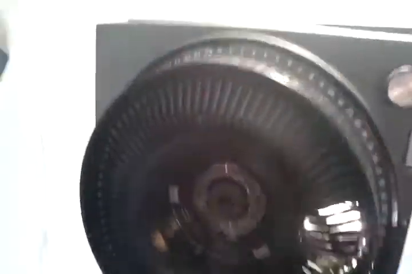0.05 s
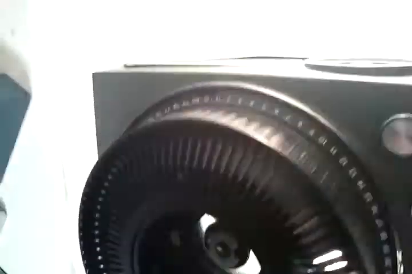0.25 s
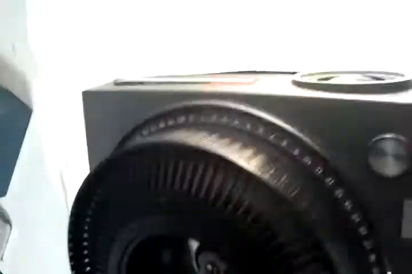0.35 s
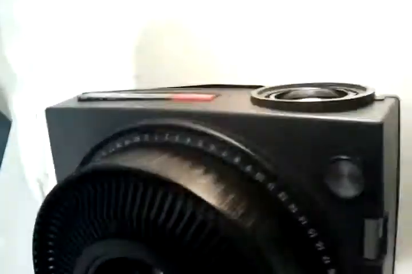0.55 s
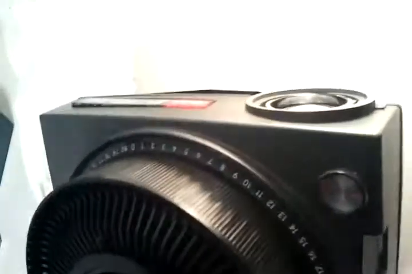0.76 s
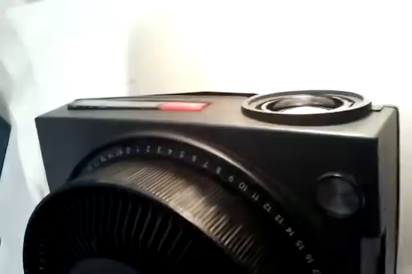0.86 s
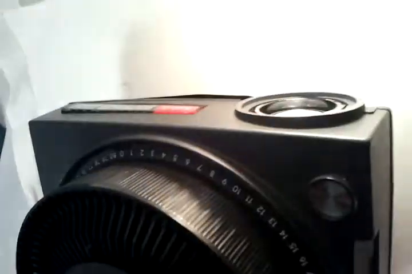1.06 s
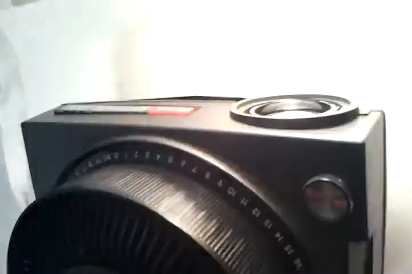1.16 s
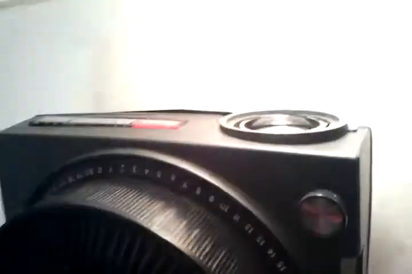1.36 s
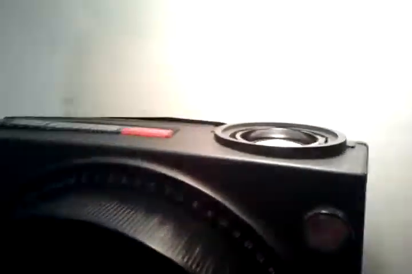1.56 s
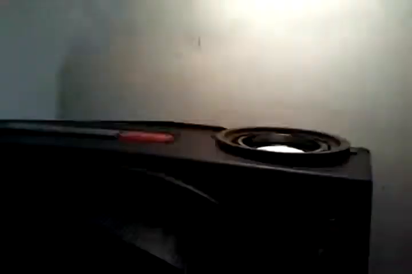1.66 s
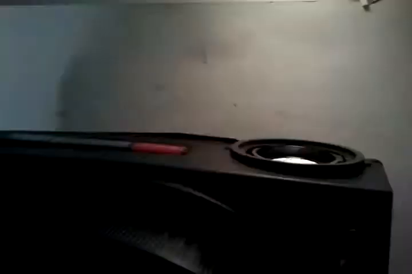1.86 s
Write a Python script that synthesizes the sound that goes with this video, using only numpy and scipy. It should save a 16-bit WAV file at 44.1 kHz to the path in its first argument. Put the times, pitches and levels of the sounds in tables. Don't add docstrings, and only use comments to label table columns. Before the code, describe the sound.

A slide projector runs close to a small, dull microphone in a quiet room. Dry, uneven ticks patter about forty times a second over fan air, low hum and a faint two-tone whine that sags around 0.8 seconds. A loud metallic lever clack rattles and distorts at 0.2; small knocks and scrapes follow, clustering near 0.87 and 1.3; a second harsh tray clack hits at 1.6, then ticking continues.

```python
import sys
import numpy as np
from scipy import signal
from scipy.fft import rfft, irfft
from scipy.io import wavfile
from scipy.ndimage import uniform_filter1d

SR = 44100
rng = np.random.default_rng(int(sys.argv[2]) if len(sys.argv) > 2 else 0)


def store_wav(level_fs):
    pcm = np.round(np.clip(np.atleast_2d(level_fs), -1, 1) * 32767)
    wavfile.write(sys.argv[1], SR, pcm.T.astype(np.int16))


def undo_db(level):
    steps = np.asarray(level, float) / 20
    return 10 ** steps


N = 83790

# start_s, first_tick_db, second_tick_db
SHAFT_TURNS = [(.0159, -14, -13), (.1062, -19, -15.5), (.195, -8, -10.5), (.2845, -14.5, -17.5),
               (.375, -18.5, -19), (.4653, -15.5, -22.5), (.5556, -16.5, -10), (.65, -23.5, -18.5),
               (.7432, -15, -21.5), (.8365, -15, -16.5), (.9303, -18, -16.5), (1.0216, -21.5, -16.5),
               (1.1101, -15, -21.5), (1.1972, -16.5, -25), (1.2855, -21, -15), (1.3739, -14, -18.5),
               (1.4631, -18, -18.5), (1.5529, -16.5, -16.5), (1.642, -21, -28), (1.7325, -15.5, -14.5),
               (1.8253, -22, -17), (1.9185, -11, -10)]
# mode_hz, level_db, t60_s
HOUSING_MODES = [(2700, 0, 0.015), (3034, -0.5, 0.024), (3222, 3.5, 0.015), (3744, 2, 0.015),
                 (2000, -43, 0.015), (900, -10.5, 0.031)]
# time_s, pitch_hz, level_db
GEAR_TONE = [(0, 772, -41), (.3, 768, -38), (.5, 758, -43), (.72, 745, -46.5), (.85, 745, -43),
             (.96, 763, -39), (1.08, 777, -41.5), (1.3, 778, -39), (1.55, 770, -41), (1.75, 763, -44.5),
             (1.9, 758, -42.5)]
# start_s, level_db, rattle_s
CLACKS = [
    (0.2194, -7.5, 0.017),
    (1.5869, -7, 0.017),
]
# mode_hz, level_db, t60_s
LEVER_MODES = [(468, -7, .2), (900, -11, .1), (1335, -10, .1), (1600, -9, .08), (1957, -2, .14),
               (2135, 0, .3), (2258, -2, .4), (2355, -5, .12), (2650, -4, .08), (2840, -5, .08),
               (3390, -4, .08), (4150, -8, .09), (5560, -7, .08), (6300, -9, .1)]
# mode_hz, level_db, t60_s
TRAY_MODES = [(500, -7, .3), (1017, -6, .09), (1250, -7, .09), (1600, -7, .08), (1960, -2, .12),
              (2073, 0, .4), (2406, -7, .12), (2681, -3, .1), (2830, -5, .1), (3100, -1, .1),
              (3400, -5, .08), (3914, -3, .09), (6090, -5, .1), (6700, -7, .07)]
# freq_hz, level_db
CRASH_SPECTRUM = [(60, -23.5), (440, -17.5), (1100, -4), (2160, -12), (3500, -3), (4800, -10.5),
                  (6800, -10.5), (9500, -9.5)]
# start_s, level_db, length_s, body_hz, treble_db
KNOCKS = [(0.188, -30, 0.015, 1000, -1.5), (0.377, -42, 0.022, 3000, -7), (.463, -23, 0.0029, 2180, -3),
          (0.625, -30, 0.0044, 2300, 4.5), (0.636, -39, 0.014, 2400, -5), (0.706, -42, 0.03, 2500, 2),
          (0.756, -39, .002, 1200, 6), (0.767, -46.5, 0.03, 2500, 4.5), (0.8706, -25.5, .001, 2000, -0.5),
          (0.872, -29.5, 0.014, 900, -16), (0.879, -32, 0.014, 2070, -13), (1.271, -26.5, 0.009, 4100, 3.5),
          (1.278, -24, 0.0044, 2000, -5), (1.2974, -18, 0.0012, 4140, -3.5),
          (1.302, -16.5, 0.0017, 2310, 3), (1.307, -22.5, 0.006, 2560, 2),
          (1.317, -32.5, 0.012, 5150, -4.5), (1.518, -36, 0.0046, 3500, -20.5),
          (1.559, -26.5, 0.0037, 1200, 2.5), (1.574, -37.5, 0.0069, 1200, 1),
          (1.674, -37, 0.0071, 2100, -34), (1.824, -27.5, 0.0082, 2400, 4)]
# mode_hz, level_db, t60_s
PAWL_MODES = [(1550, -5, .025), (2380, -4, .03), (3300, -8, .025), (4150, -6, .02), (4900, -9, .02),
              (5700, -5, .04), (6600, -2, .04), (7900, -2, .03)]
# freq_hz, density_db
AIR_SPECTRUM = [(40, -16.5), (118, -3.5), (661, -12.5), (800, -2.5), (2320, -16), (3200, -19),
                (4600, -20.5), (9500, -29)]
# centre_hz, width_hz, level_db
CASE_RESONANCES = [(134, 21, -12), (445, 377, -3), (808, 75, -8.5), (972, 260, -6.5), (2012, 450, -8),
                   (2916, 900, -3.5), (3050, 140, -20.5), (3585, 86, -9.5), (7050, 600, -17)]

TICK_DB, TICK_SCATTER_DB, TICK_GRIT = -4.5, 1.2, .09
TICK_CENTRE_HZ, TICK_WIDTH_HZ = 3097, 1300
TICK_LAG_S, SECOND_TICK_TURNS = .0008, .352
BLADE_RATIO, BLADE_DB = 1.386, -2.5
TONE_WOBBLE_DB, PITCH_WOBBLE = 2.5, 0.00407
RATTLE_PER_S, RATTLE_SCATTER_DB, RATTLE_T60_S = 1100, 1, .11
BUZZ, RING_SHARE = .1, .42
CRACK_DB, CRACK_HZ, CRACK_T60_S = -1, 7030, 0.031
CRASH_DB, CRASH_T60_S = -1, .1
CRASH_TAIL_DB, CRASH_TAIL_T60_S = -12.5, .3
KNOCK_RISE_S, KNOCK_T60_S, KNOCK_START = .0007, 0.042, 0.27
KNOCK_GRIT, KNOCK_WIDTH, TREBLE_HZ = .6, .35, 7400
KNOCK_RING_DB = -25
THUMP_S, THUMP_HZ, THUMP_DB, THUMP_T60_S = 1.3, 75, -29.5, 0.097
AIR_DB, CASE_DB, FLICKER_DB = -39, -36.5, 4.5
HUM_HZ, HUM_DB, HUM_WOBBLE_DB = 118.3, -47.5, 1
ROOM_DB, ROOM_T60_S = -16.5, 0.16
MIC_TOP_HZ, MIC_STOP_HZ, MIC_LOW_HZ = 7730, 9517, 65.8
CEILING, KNEE = .72, 20


def level(x, db):
    return x * undo_db(db) / np.sqrt(np.mean(x ** 2))


def band(x, hz, width_hz):
    return signal.lfilter(*signal.iirpeak(hz, hz / width_hz, fs=SR), x)


def ring(x, modes):
    out = 0
    for hz, db, t60_s in modes:
        pole = np.exp(2j * np.pi * hz / SR - np.log(1000) / (t60_s * SR))
        out = out + undo_db(db) * signal.lfilter([1], [1, -pole], x).imag
    return out


def colour(points):
    hz, db = np.array(points).T
    log_hz = np.log(np.fft.rfftfreq(N, 1 / SR) + 1)
    gain = undo_db(np.interp(log_hz, np.log(hz), db))
    return level(irfft(rfft(rng.standard_normal(N)) * gain, N), 0)


def walk(rate_hz):
    k = int(SR / rate_hz)
    steps = np.repeat(rng.standard_normal(N // k + 1), k)
    return 0.95 * uniform_filter1d(uniform_filter1d(steps, k), k)[:N]


def burst(t, start_s, length_s, rise_s, t60_s):
    rise = np.clip((t - start_s) / rise_s, 0, 1)
    return rise * undo_db(-60 * np.clip(t - start_s - length_s, 0, None) / t60_s)


def shaft_ticks(t):
    times, first_db, second_db = np.array(SHAFT_TURNS).T
    turns = np.arange(len(times)) * 2.
    whole = np.arange(turns[-1])
    when = np.interp(whole[:, None] + [0, SECOND_TICK_TURNS], turns, times) + TICK_LAG_S
    db = np.c_[np.interp(whole, turns, first_db), np.interp(whole, turns, second_db)]
    db = db + TICK_SCATTER_DB * rng.standard_normal(when.shape)
    inside = when < t[-1]
    clicks = np.zeros(N)
    clicks[(when[inside] * SR).astype(int)] = undo_db(db[inside] + TICK_DB)
    rub = signal.lfilter([1], [1, -.98], np.roll(clicks, 1))
    push = rng.standard_normal(N) * TICK_GRIT * rub
    soft = band(clicks + push, TICK_CENTRE_HZ, TICK_WIDTH_HZ)
    soft = band(soft, TICK_CENTRE_HZ, TICK_WIDTH_HZ)
    return ring(soft, HOUSING_MODES) / 2


def gear_and_blade_tones(t):
    times, hz, db = np.array(GEAR_TONE).T
    pitch_hz = np.interp(t, times, hz) * (1 + PITCH_WOBBLE * walk(18))
    angle = 2 * np.pi * np.cumsum(pitch_hz) / SR
    gear = undo_db(TONE_WOBBLE_DB * walk(15)) * np.sin(angle)
    blade = undo_db(BLADE_DB + TONE_WOBBLE_DB * walk(15)) * np.sin(BLADE_RATIO * angle)
    return np.sqrt(2) * undo_db(np.interp(t, times, db)) * (gear + blade)


def changer_clacks(t):
    out = 0
    for (start_s, db, length_s), parts in zip(CLACKS, (LEVER_MODES, TRAY_MODES)):
        chance, size = rng.random((2, N))
        hits = (chance < RATTLE_PER_S / SR) * undo_db(-RATTLE_SCATTER_DB * np.log(size + 1e-9))
        shake = (hits + BUZZ) * burst(t, start_s, length_s, .0005, RATTLE_T60_S)
        rung = 0
        for hz, part_db, t60_s in parts:
            part = ring(shake * rng.standard_normal(N), [(hz, 0, RING_SHARE * t60_s)])
            rung = rung + level(part, part_db)
        crack = level(band(rng.standard_normal(N), CRACK_HZ, 1500), CRACK_DB)
        crack = crack * burst(t, start_s, 0.0018, .0003, CRACK_T60_S)
        fade = burst(t, start_s, length_s * 1.06, .001, CRASH_T60_S)
        fade = fade + undo_db(CRASH_TAIL_DB) * burst(t, start_s, length_s, 0.00076, CRASH_TAIL_T60_S)
        crash = undo_db(CRASH_DB) * colour(CRASH_SPECTRUM) * fade
        out = out + undo_db(db) * (level(rung, -20.5) + crash + crack)
    return out


def knocks_and_scrapes(t):
    out, shake = 0, 0
    for start_s, db, length_s, hz, treble_db in KNOCKS:
        grit = rng.standard_normal(N) * rng.exponential(size=N) ** KNOCK_GRIT
        swell = np.clip(KNOCK_START + (t - start_s) / length_s, 0, 1)
        shape = undo_db(db) * burst(t, start_s, length_s, KNOCK_RISE_S, KNOCK_T60_S) * swell
        body = band(band(grit, hz, hz * KNOCK_WIDTH), hz, hz)
        treble = level(band(grit, TREBLE_HZ, 4500), treble_db)
        out = out + shape * (level(body, 0) + treble)
        shake = shake + shape * grit
    thump = undo_db(THUMP_DB) * np.sin(2 * np.pi * THUMP_HZ * (t - THUMP_S))
    thump = thump * burst(t, THUMP_S, 0, .004, THUMP_T60_S)
    return out + undo_db(KNOCK_RING_DB) * ring(shake, PAWL_MODES) + thump


def fan_air():
    case = 0
    for hz, width_hz, db in CASE_RESONANCES:
        flicker = undo_db(db + FLICKER_DB * walk(14))
        noise = band(band(rng.standard_normal(N), hz, width_hz), hz, width_hz)
        case = case + flicker * level(noise, 0)
    return undo_db(AIR_DB) * colour(AIR_SPECTRUM) + level(case, CASE_DB)


def mains_hum(t):
    return np.sqrt(2) * undo_db(HUM_DB + HUM_WOBBLE_DB * walk(24)) * np.sin(2 * np.pi * HUM_HZ * t)


def room(struck, t):
    tail = rng.standard_normal(N // 4) * burst(t[:N // 4], 0.0013, 0, 0.021, ROOM_T60_S)
    return undo_db(ROOM_DB) * signal.fftconvolve(struck, tail / np.sqrt(np.sum(tail ** 2)))[:N]


def scene():
    t = np.arange(N) / SR
    struck = shaft_ticks(t) + changer_clacks(t) + knocks_and_scrapes(t)
    steady = gear_and_blade_tones(t) + fan_air() + mains_hum(t)
    return (struck + room(struck, t) + steady)[None]


def top_cut(x):
    return signal.sosfilt(signal.butter(12, 16540, fs=SR, output="sos"), x)


def record(dry):
    dull = signal.sosfilt(signal.cheby2(14, 70, MIC_STOP_HZ, fs=SR, output="sos"), dry)
    dull = signal.sosfilt(signal.butter(6, MIC_TOP_HZ, fs=SR, output="sos"), dull)
    overloaded = dull / (1 + np.abs(dull / CEILING) ** KNEE) ** (1 / KNEE)
    mix = signal.sosfilt(signal.butter(2, MIC_LOW_HZ, "high", fs=SR, output="sos"), overloaded)
    return top_cut(mix)


dry = scene()
out = record(dry)
store_wav(out)
```